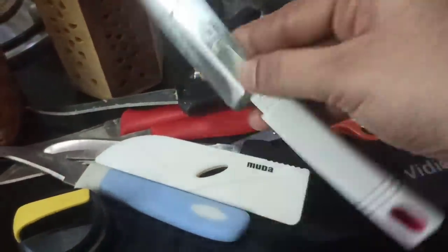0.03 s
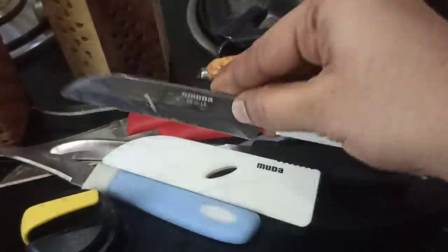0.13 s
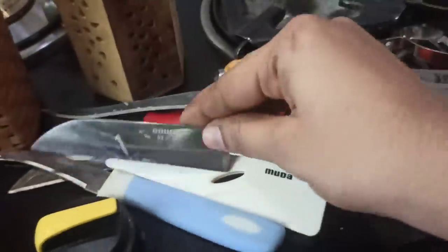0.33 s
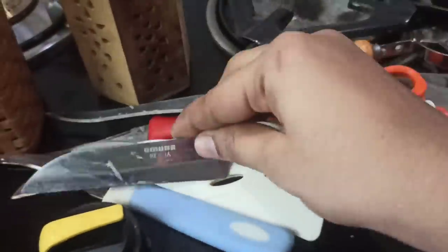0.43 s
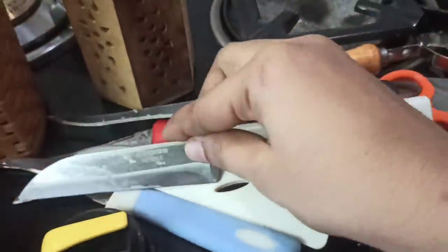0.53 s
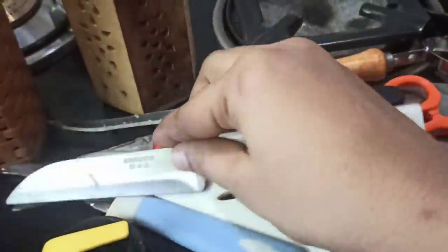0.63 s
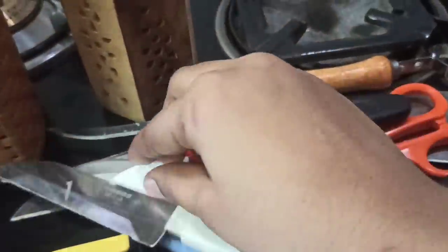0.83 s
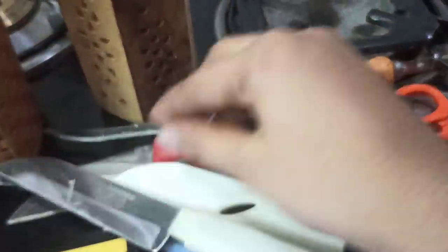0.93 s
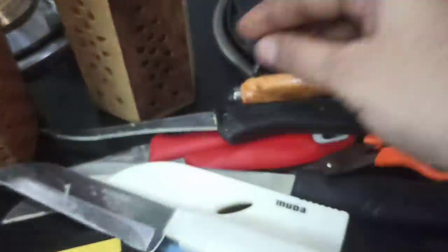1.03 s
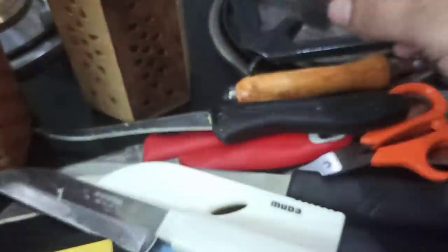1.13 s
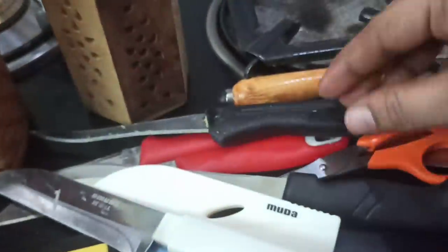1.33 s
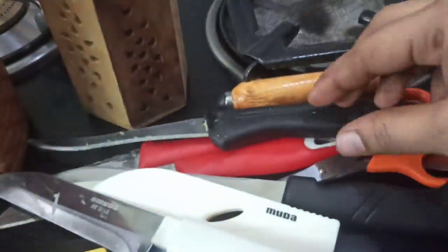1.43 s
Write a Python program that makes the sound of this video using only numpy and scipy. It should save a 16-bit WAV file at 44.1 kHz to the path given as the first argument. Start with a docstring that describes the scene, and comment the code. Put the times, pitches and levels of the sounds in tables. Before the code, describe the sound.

Close by, a knife is set down on other knives on a hard countertop: a sharp clack, a few softer taps, a quick rattle and a final thin click. The small, slightly echoing kitchen hums faintly.

```python
"""A small hard-walled kitchen, with a low electric hum and soft room noise.
Close by, a knife is laid on a pile of knives on a hard countertop. It lands with a sharp clack, rocks,
then clatters off its neighbours as the hand lets go; a blade tip settles with one last light click.
Each contact is a burst of noise coloured by the knife's resonances, and the walls reverberate it.
Blades and handles ring on briefly as decaying sine modes."""
import sys
import numpy as np
from scipy import signal
from scipy.fft import rfft, irfft
from scipy.io import wavfile
from scipy.ndimage import uniform_filter1d

SR = 44100
rng = np.random.default_rng(int(sys.argv[2]) if len(sys.argv) > 2 else 0)


def master(y):
    """Save y as 16-bit WAV."""
    cut = np.clip(np.atleast_2d(y).T, -1, 1)
    pcm = np.round(cut * 32767)  # scale
    wavfile.write(sys.argv[1], SR, pcm.astype(np.int16))


N = 66150
T = np.arange(N) / SR
FREQS = np.maximum(np.fft.rfftfreq(N, 1 / SR), 1)
ATTACK_S, SPREAD_HZ = 0.00042, 1470  # rise of a strike; where its stereo image opens up

# knife on knife (time [s], level [dB], bass [dB], treble [dB], clack t60 [s], blade ring [dB],
# pile ring [dB], ping pitch [Hz], ping lift [dB], left minus right [dB])
CONTACTS = [ (0.2379, -3, -6, 3.5, 0.022, 3, -11.5, 4670, 3, -0.5),
            (0.2405, -2.5, -4.5, -2.5, 0.03, -30, -23, 3800, 11, 0.5),
            (.2462, -6, 4, 4.5, 0.039, -28, -4.5, 3790, 9.5, 1),
            (.2900, -20.5, 15.5, 5, 0.075, -15, -5, 790, 9, -2.5),
            (0.304, -23.5, -6.5, -1, 0.046, -24, -19, 6370, 16.5, 9),
            (0.394, -16.5, 0.5, -3.5, 0.052, -14, 0.5, 1970, 3.5, 0.5),
            (.4000, -23, 9.5, 3.5, 0.035, -32, -28, 1200, 5, 1.5),
            (.5335, -24, 17, -8, 0.11, 2, -5.5, 2420, 3.5, 0.5),
            (0.545, -25, 13.5, 5.5, .03, -37, -4, 5250, 8, -0.5),
            (.6650, -35.5, 15, 2, .08, -22, -4, 750, 6, 3), (0.698, -34, 14, 10, 0.13, -15, -2, 850, 8, 0),
            (0.7118, -16, -3, 2, 0.03, -41, 3.5, 1750, 6, 0.5),
            (0.7439, -16.5, -1, 0.5, 0.029, 1, -7.5, 1820, 4.5, -0.5),
            (.7620, -20, -9, 7, 0.24, -12, 9.5, 6400, -5, 0.5),
            (0.7847, -12.5, 10.5, 1.5, 0.078, -18, 0, 740, -1.5, -1),
            (0.79, -10, 2, 3.5, 0.052, -12, -11.5, 5300, 5, 3),
            (.8015, -17, 15.5, 7, 0.058, -14, 8.5, 8200, 11.5, -0.5),
            (.8300, -18, -3, -14, 0.059, -28, 3, 3730, 15, -11),
            (.8418, -19.5, 5, 4.5, 0.021, -23, -21, 8200, 14, 8),
            (0.844, -18, -1.5, 2, 0.038, -22, -11, 3980, 12, -1.5),
            (0.862, -18, 0.5, -19, 0.057, -24, 5.5, 4070, -3, 4),
            (0.8693, -12.5, 4.5, -8, 0.022, -25, -1.5, 2500, 12, 0.5),
            (.8740, -13, 2, -4.5, 0.054, -29, -4, 1260, 1.5, -1)]


def undb(db):
    """Decibels to gain."""
    return 10 ** (np.asarray(db) / 20)


def curve(points):
    """A table of (frequency [Hz], value) read on a log-frequency axis."""
    hz, value = np.array(points).T
    return np.interp(np.log(FREQS), np.log(hz), value)


def bump(hz, half_width_hz):
    """Shape of a resonance, 1 at its centre."""
    return 1 / (1 + ((FREQS - hz) / half_width_hz) ** 2)


def fade(t60):
    """Exponential decay, down 60 dB after t60 seconds."""
    return np.exp(-np.log(1000) * T / max(t60, 1e-3))


def colour(x, db):
    """Minimum-phase EQ: nothing sounds ahead of the strike."""
    cepstrum = irfft(np.log(undb(db)), N)
    cepstrum[1:N // 2] *= 2
    cepstrum[N // 2 + 1:] = 0
    response = irfft(np.exp(rfft(cepstrum)), N)[None, :SR // 10]
    return signal.fftconvolve(x, response, axes=1)[:, :N]


def flatten(x, width_hz=500):
    """Level out the broad hills of a spectrum and keep its fine peaks."""
    power = uniform_filter1d(np.abs(rfft(x)) ** 2, int(width_hz * N / SR), axis=1)
    eq_db = -10 * np.log10(power + 1e-12)
    return np.array([colour(channel[None], db)[0] for channel, db in zip(x, eq_db)])


def stereo_noise(spread_hz, spread):
    """White noise, centred in the bass and wider above."""
    width = spread * FREQS / np.hypot(FREQS, spread_hz)
    mid, side = rfft(rng.standard_normal((2, N)))
    return irfft(np.array([mid + width * side, mid - width * side]) / np.sqrt(1 + width ** 2), N)


def add(out, x, at_s, pan_db):
    """Mix a sound in at its time and place; positive pan is left."""
    start = int(at_s * SR)
    out[:, start:] += x[:, :N - start] * undb(np.array([[pan_db], [-pan_db]]) / 2)


def room_tone(air_db=-50, waver_db=1.5):
    """A slightly wavering electric hum over a soft murmur of air."""
    # colour of the air (frequency [Hz], gain [dB])
    air_eq = [(25, -30), (60, -15.5), (125, -1), (190, -12), (370, -7.5), (600, -18), (1200, -27),
              (2500, -33.5), (5300, -39), (7800, -33.5), (12000, -44.5), (15000, -37)]
    # tones of the hum (frequency [Hz], level [dB])
    hum_tones = [(100, -45), (106, -70.5)]
    air = irfft(rfft(stereo_noise(spread_hz=530, spread=0.95)) * undb(curve(air_eq)), N)
    waver = irfft(rfft(rng.standard_normal(N)) / (1 + (FREQS / 10) ** 4), N)
    hum = sum(np.sqrt(2) * undb(db) * np.sin(2 * np.pi * (hz * T + rng.random())) for hz, db in hum_tones)
    hum *= undb(waver_db * waver / waver.std())
    out = undb(air_db) * air / air.std()
    add(out, hum[None], 0, pan_db=-2.5)
    return out


def impact(t60, crack_db=-19):
    """A hard crack and the dense, quickly damped ringing after it."""
    decay = fade(t60) + undb(crack_db) * fade(t60=0.013)
    attack = 1 - np.exp(-T / ATTACK_S)
    return flatten(stereo_noise(SPREAD_HZ, spread=0.96) * decay * attack)


def knife_clacks(gain_db=18, body_q=36, bass_hz=760, treble_hz=3900):
    """Knife strikes knife: every clack has the same body, with its own weight, edge and ping."""
    # colour of a clack (frequency [Hz], gain [dB])
    clack_eq = [(40, -41), (160, -29), (250, -11), (380, -6.5), (800, 4), (1050, 0.5), (1600, 0),
                (2400, -3.5), (3300, -9), (3800, -5.5), (4400, -7), (5000, -12.5), (5700, -14),
                (6500, -9.5), (7600, -10), (12000, -21), (15000, -24)]
    # damped resonances of a knife held by its handle, in rows (frequency [Hz], lift [dB])
    resonances = [ (772, 1750, 3080, 3980, 4530, 5320, 6220, 8230),
                  (4.06, 2.8, 7.5, 3.8, 5.4, 4.4, 7.6, 1.2)]
    body = curve(clack_eq) + sum(db * bump(hz, hz / body_q) for hz, db in zip(*resonances))
    bass_shelf = 1 / (1 + (FREQS / bass_hz) ** 4)
    treble_shelf = 1 / (1 + (treble_hz / FREQS) ** 4)
    out = np.zeros((2, N))
    for at_s, db, bass_db, treble_db, t60, _, _, ping_hz, ping_db, pan_db in CONTACTS:
        ping = ping_db * bump(ping_hz, half_width_hz=220)
        tone = body + bass_db * bass_shelf + treble_db * treble_shelf + ping
        add(out, colour(impact(t60), tone + gain_db + db), at_s, pan_db)
    return out


def ring(modes, gain_db=-27.5, spread_rad=1.4):
    """Decaying modes; the higher ones reach left and right out of step."""
    out = 0
    for k, (hz, db, t60) in enumerate(zip(*modes)):
        skew = (-1) ** k * spread_rad * hz / np.hypot(hz, SPREAD_HZ)
        phase = 2 * np.pi * hz * T + np.array([[skew], [-skew]]) / 2
        out = out + undb(db + gain_db) * fade(t60) * np.sin(phase)
    return out * (1 - np.exp(-T / ATTACK_S))


def knife_rings():
    """Each contact sets the blade and the pile under it ringing."""
    # modes of the blade, in rows (frequency [Hz], level [dB], t60 [s])
    blade_modes = [ (772, 1020, 1200, 1815, 2771, 3125, 3731, 3922, 4028, 4550, 4728, 6153, 6168, 6376),
                   (1.5, -7, -9, -3.5, -3.5, -8.5, -4.5, -8, -14.5, 2.5, 0, -5, -14.5, -7),
                   (0.5752, -0.05, 0.4, 0.274, 0.24, 0.3658, 0.17, 0.25, 0.22, 0.13, 0.1, 0.51, 0.43, .25)]
    # modes of the pile, in rows (frequency [Hz], level [dB], t60 [s])
    pile_modes = [ (394, 534, 573, 631, 735, 808, 1265, 1442, 2166, 2527, 3985, 8200),
                  (-3.5, -4, 0, 0.5, -2, -2, -3, -1, -8, -11.5, -13, -14),
                  (0.41, 0.39, 0.18, 0.09, 0.6, 0.4, 0.42, 0.21, 0.4161, 0.4, 0.41, .15)]
    blade, pile = ring(blade_modes), ring(pile_modes)
    out = np.zeros((2, N))
    for at_s, db, _, _, _, blade_db, pile_db, _, _, pan_db in CONTACTS:
        add(out, undb(db + blade_db) * blade + undb(db + pile_db) * pile, at_s, pan_db)
    return out


def kitchen_reverb(x, wet_db=-4.5, predelay_s=0.0035, build_s=0.0013):
    """Diffuse reverberation of hard walls; the treble dies sooner than the bass."""
    # decay of the room by band (frequency [Hz], t60 [s])
    bands = [(250, 0.93), (600, 0.58), (1500, 0.45), (4000, 0.43), (8000, 0.33), (14000, .35)]
    noise = rfft(stereo_noise(SPREAD_HZ, spread=1))
    tail = np.zeros((2, N))
    for centre_hz, t60 in bands:
        band = curve([(hz, float(hz == centre_hz)) for hz, _ in bands])
        tail += irfft(noise * band, N) * fade(t60)
    tail *= 1 - np.exp(-np.maximum(T - predelay_s, 0) / build_s)
    tail /= np.sqrt(np.sum(tail ** 2) / 2)  # unit energy a side
    return undb(wet_db) * signal.fftconvolve(x, tail, axes=1)[:, :N]


def blade_tip(click_db=14.5):
    """A blade tip settles: a thin, bright click with a bounce and a short ring."""
    # touches of the tip (time [s], level [dB], left minus right [dB])
    touches = [(1.1391, -28, -1), (1.1472, -21.5, -3), (1.156, -29.5, 7)]
    # colour of the click (frequency [Hz], gain [dB])
    click_eq = [(150, -14), (400, 8), (800, 5.5), (2600, 2), (3600, -4), (4250, -0.5), (4600, -3),
                (5100, -9.5), (6000, -0.5), (6800, 2), (8000, -3.5), (14000, -9)]
    # modes of the tip, in rows (frequency [Hz], level [dB], t60 [s])
    tip_modes = [ (750, 4590, 6400, 6830, 7050), (4.06, 6, 2.2, 4.2, 4.3),
                 (0.122, 0.053, 0.041, 0.063, 0.084)]
    clicks, rings = np.zeros((2, 2, N))
    tip = ring(tip_modes)
    for at_s, db, pan_db in touches:
        add(clicks, undb(db + click_db) * impact(t60=0.019), at_s, pan_db)
        add(rings, undb(db) * tip, at_s, pan_db)
    return colour(clicks, curve(click_eq)) + rings


def scene():
    """Clacks and tip feed the reverb; blade and pile ring dry over the room tone."""
    strikes = knife_clacks() + blade_tip()
    return strikes + knife_rings() + kitchen_reverb(strikes) + room_tone()


def record(dry):
    """Master EQ: a wide notch in the treble and a steep high cut."""
    notch = signal.ellip(4, .5, 28, (8680, 11550), "bandstop", fs=SR, output="sos")
    high_cut = signal.ellip(10, .2, 90, 15400, fs=SR, output="sos")
    return signal.sosfilt(np.vstack([notch, high_cut]), dry)


dry = scene()
out = record(dry)
master(out)
```